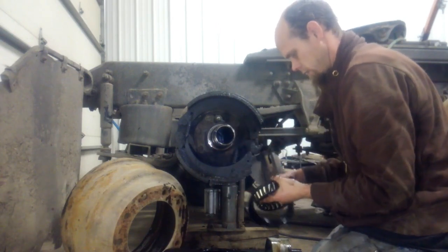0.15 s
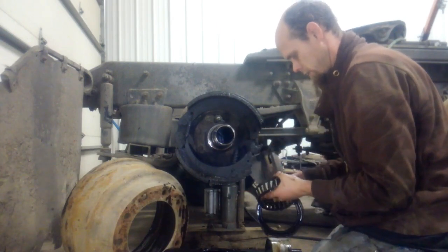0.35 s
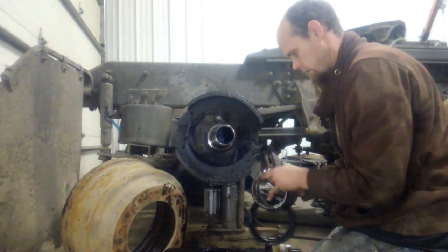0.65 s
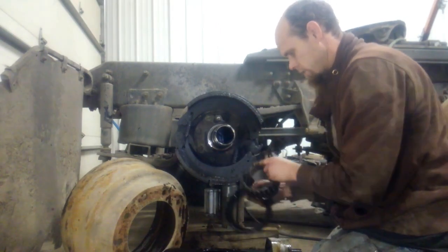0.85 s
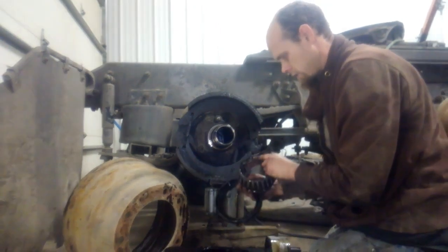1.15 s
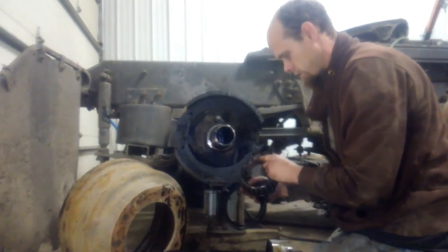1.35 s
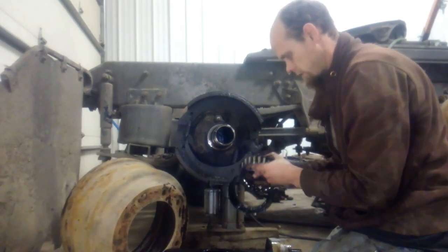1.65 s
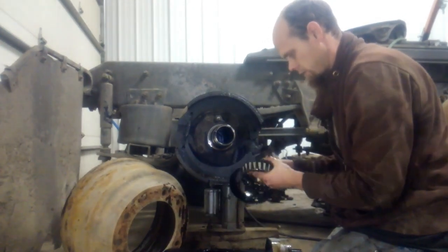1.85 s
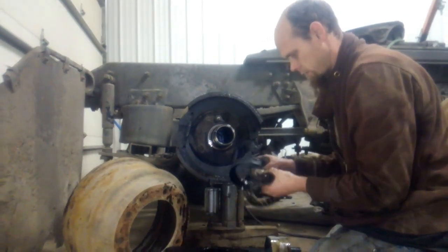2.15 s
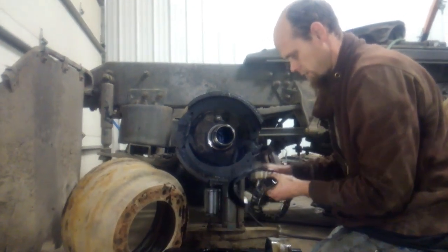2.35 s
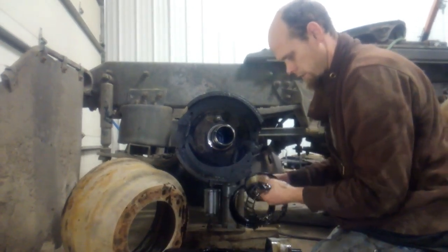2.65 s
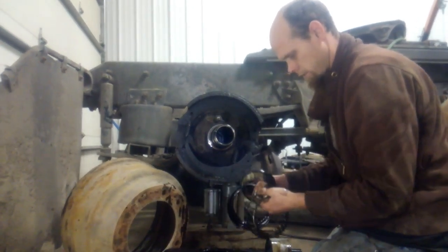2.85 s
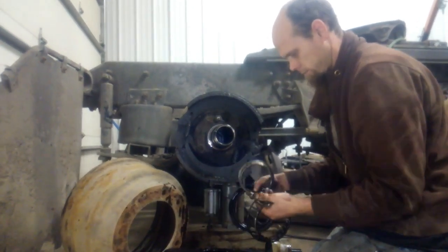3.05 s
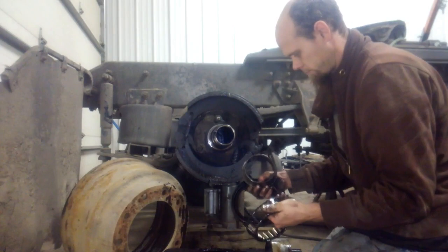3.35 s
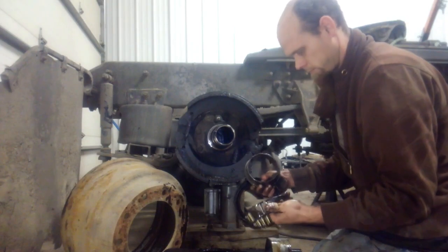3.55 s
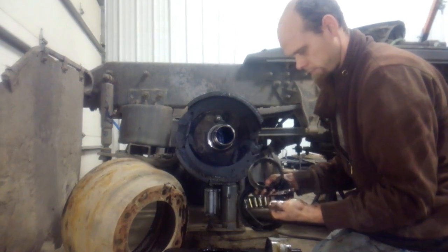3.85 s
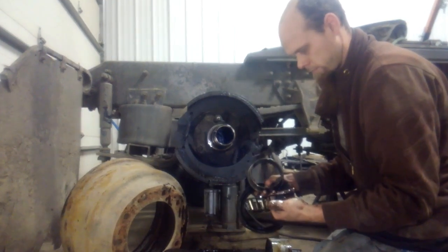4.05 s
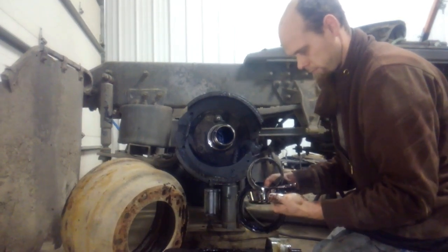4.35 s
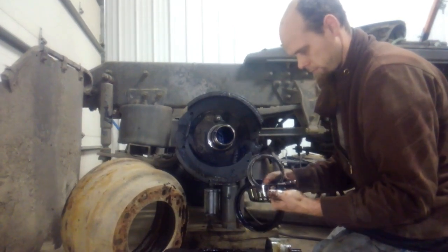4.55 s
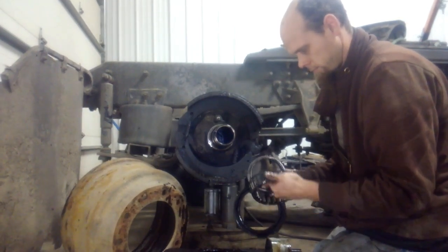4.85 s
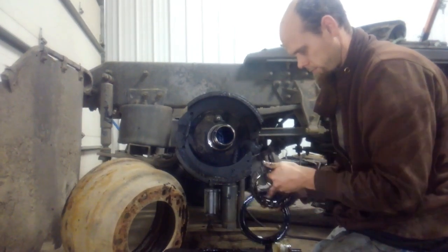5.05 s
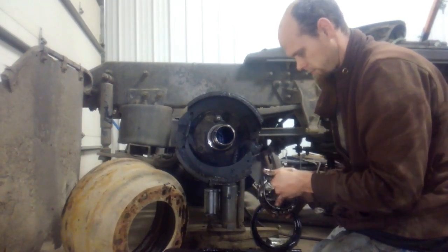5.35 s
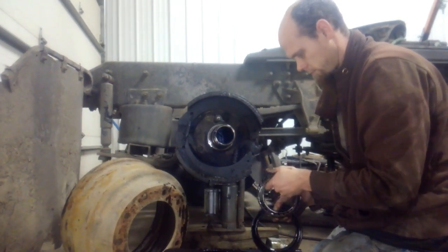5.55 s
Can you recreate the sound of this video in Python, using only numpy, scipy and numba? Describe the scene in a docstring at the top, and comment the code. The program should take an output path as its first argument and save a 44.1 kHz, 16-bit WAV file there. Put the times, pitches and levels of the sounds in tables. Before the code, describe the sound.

Close mono pickup with some hard room reflection and a faint low motor hum. Loose rollers tick in their cage, followed by a busy rattle, a deep hollow bang and uneven dragging. Two prominent ringing steel strikes stand out around three seconds, another is quickly damped, and the shop falls nearly silent before small bright clinks, ticks and a final soft low thump.

```python
"""Roller bearings are handled beside a wheel hub in a workshop: clicks of filtered noise with rattle and cage ring.
A small race tings and a large race is struck and rings, both as sums of decaying modes.
Something heavy bumps (damped low sines) and drags (scraping noise through resonances) with a rumble.
The shop hums behind; the camera's limiter ducks under the loud blows."""
import sys
import numpy as np
from scipy import signal
from scipy.fft import rfft, irfft, next_fast_len
from scipy.io import wavfile
from scipy.ndimage import uniform_filter1d, map_coordinates
from numba import njit

SR = 44100
rng = np.random.default_rng(int(sys.argv[2]) if len(sys.argv) > 2 else 0)


def store_pcm(level_fs):
    """Save levels as 16-bit WAV."""
    pcm = np.round(np.clip(level_fs, -1, 1) * 32767).astype(np.int16)
    wavfile.write(sys.argv[1], SR, np.atleast_2d(pcm).T)


N = 251811

# Levels throughout are ahead of the limiter.
# roller and steel clicks: (time [s], smoothed peak [dB], brightness [dB], looseness [dB])
CLICKS = [(0.016, -34.5, -4, 4.5), (.0615, -25.5, -4, 4), (0.147, -32, -3.5, -2.5),
          (0.2246, -15.5, -0.5, 2), (0.2351, -19, -1.5, -16), (0.436, -38, -1, 3.5), (0.6834, -38, -9, -1),
          (0.7562, -36.5, -3, 2), (0.7655, -38.5, -8, 2.5), (0.8815, -26.5, -0.5, -2),
          (0.9402, -30, -5, -5), (0.9586, -28, -2, 2), (1.047, -41, -13, -12), (1.059, -22, 1, 1.5),
          (1.4725, -34, -1.5, -2), (1.5896, -41, -5, 9.5), (1.621, -36, 12, -5), (1.914, -42, 4, 17),
          (1.9487, -34.5, 7, 3), (1.993, -26.5, 7.5, 9.5), (2.042, -30.5, -4, 8), (2.101, -28, 5, 14),
          (2.1135, -34, -3, 6.5), (2.154, -18.5, 4, 4.5), (2.1716, -22, 8, 13.5),
          (2.2926, -12.5, 6.5, -0.5), (2.317, -17, 8.5, 7.5), (2.337, -23.5, 8, 3), (2.348, -21.5, 13, 2),
          (2.3682, -18, 13, 15.5), (2.3842, -8.5, 8.5, -18), (2.4371, -8, -21, -2),
          (2.4925, -15.5, -16, -3), (2.523, -8.5, -16.5, 2.5), (2.667, -18, 5, 3), (2.7141, -27, -21, 8),
          (2.7598, -19.5, 6.5, -4), (2.7984, -25.5, 11, -8), (2.805, -18, -12, -7),
          (2.9137, -24.5, -35, -15), (2.9534, -28, -8, -3), (2.963, -12, -24.5, -12), (3.006, -21.5, 1, -1),
          (3.047, -18.5, 2, -1), (3.0655, -20, 11, 4.5), (3.1466, -9.5, -1, -9), (3.3641, -14.5, -6, -8),
          (3.4066, -23, -33, -18), (3.49, -14, 15, 17), (3.5016, 2, 14.5, -13), (3.6183, -12, 5, -5),
          (3.665, -19.5, -1, 9), (3.7773, -30.5, 1, -5), (4.9335, -22, 4, 13.5), (5.002, -23.5, -3, 3),
          (5.033, -28, 3, 3), (5.1039, -13.5, 11.5, 1), (5.1535, -15, 10.5, 0.5), (5.2702, -35.5, -11, -1),
          (5.294, -35, -3, 6), (5.3581, -28.5, 2, 13), (5.3925, -24.5, -5, -5), (5.531, -20.5, 25.5, -2),
          (5.5324, -12.5, -10, -2)]
# faint ticks of rollers shifting in the cage: (start [s], end [s], mean smoothed peak [dB])
SHIFTS = [(0.725, 0.797, -40.5), (0.965, 0.995, -51), (1.598, 1.676, -42), (2.659, 2.702, -23.5)]
# click spectrum: (frequency [Hz], density [dB per Hz])
CLICK_COLOUR = [(590, -55), (1000, -25), (2050, -9), (2910, -11), (3120, -10), (3380, -8.5), (4120, -3),
                (4470, -2), (5310, 5), (8450, -11.5), (10800, -20), (14200, -28), (16000, -53)]
# roller cage modes: (frequency [Hz], width [Hz], level [dB])
CAGE_MODES = [(1900, 200, -7), (5330, 320, 0), (7700, 300, -14)]
# small race tings: (time [s], level [dB], t60 [s], main mode [Hz], twin mode [dB], upper modes [dB])
TINGS = [(2.045, -26, 0.31, 5510, -3, -20), (2.101, -19.5, 0.054, 5380, 3, -17),
         (2.158, -31, 0.49, 5647, -18, -12), (2.178, -21, 0.22, 5420, -1, -2),
         (2.209, -25.5, 0.22, 5480, 3, -15), (2.368, -18.5, 0.099, 5440, 5, 6.5),
         (4.935, -16.5, 0.15, 5444, 10.5, 3), (5.004, -18.5, 0.19, 5520, -11, -8),
         (5.034, -13.5, 0.04, 5360, 0.5, -7), (5.292, -20.5, 0.061, 5340, 8, 1.5),
         (5.354, -20, 0.16, 5360, 8, -5), (5.394, -32, 0.25, 5600, -13, -6)]
# small race, other modes: (frequency [Hz], level [dB])
SMALL_RACE_MODES = [(1900, -37), (2005, -22.5), (5313, -37), (5700, -5.5), (7605, -13), (9725, -20.5),
                    (12970, -38), (14520, -39)]
# large race modes: (frequency [Hz], level struck at spot 1 [dB], spot 2 [dB], spot 3 [dB])
BIG_RACE_MODES = [(2060, -30, -24, -18), (2690, -32, -17, -24), (2718, -20, -30, -23),
                  (3176, -24, -26, -28), (3550, -17, -13, -18), (3823, -12, -30, -22),
                  (4251, -11, -22, -34), (4512, 0, -21, -9), (4544, -26, -20, -17), (4632, -23, -1, 0),
                  (5244, 0, -7, -20), (5274, -8, -6, 0), (6062, -3, -12, -14), (6134, -19, -5, -12),
                  (6250, -12, -4, -5), (6922, -5, -10, -18), (7181, -14, -21, -35), (7492, -29, -5, -25),
                  (7800, -6, -14, -19), (7822, -26, -8, -12), (8727, -21, 0, -7), (8895, -31, -10, -27),
                  (9584, -14, -10, -27), (9942, -29, -19, -34), (10417, -24, -13, -30),
                  (11184, -19, -19, -35), (11597, -13, -10, -23), (12592, -16, -17, -35),
                  (13736, -26, -22, -38), (14283, -33, -32, -36)]
# large race strikes, one per spot: (time [s], level [dB], time the ring is quickly damped [s])
STRIKES = [(3.142, -10.5, 3.48), (3.5, -11, 6.2), (3.617, -15.5, 3.69)]
# large race decay: (frequency [Hz], t60 [s])
RING_T60 = [(2000, 0.66), (4000, 0.49), (5000, 0.53), (6100, 0.55), (7500, 0.47), (8700, 0.48),
            (10000, 0.46), (13000, 0.45)]
# dull bumps: (time [s], nominal level [dB], pitch [Hz])
BUMPS = [(.776, -30, 342), (2.323, -36.5, 280), (2.381, -25, 320), (2.4364, 4.5, 603), (2.493, -3.5, 587),
         (2.511, -2.5, 612), (2.523, -1, 634), (2.807, -10.5, 340), (2.918, -9, 574), (2.963, -3, 320),
         (3.368, -11, 320), (3.4035, -8, 596), (4.36, -36, 368), (5.33, -31.5, 219), (5.579, -17, 198)]
# shoves of the heavy part: (start [s], end [s], boom [dB], body [dB], grit [dB],
#                            fade [dB per s, negative swells], power share of the higher boom [0-1])
SHOVES = [(2.435, 2.813, -17, -12, -16.5, 48.5, 0.78), (2.808, 2.959, -16.5, -25, -29, 29, 0.47),
          (2.956, 3.143, -17, -20, -30.5, 44, 0.69), (3.141, 3.37, -32.5, -33, -35, 57, 0.5),
          (3.366, 3.5, -17, -18, -30.5, 51, 0.74), (3.5, 3.912, -34, -31, -27, 67.5, 0.47),
          (5.576, 5.72, -25.5, -36, -42, -26, 0.17)]
# drag booms, low and high: (frequency [Hz], width [Hz])
BOOMS = [(212, 32.6), (325, 87)]
# hollow body wall modes: (frequency [Hz], width [Hz], level [dB])
BODY_MODES = [(564, 71, -3.5), (795, 113, -5.5), (964, 71, -4), (1215, 250, -9), (1717, 170, -12.5),
              (2360, 330, -27)]
# grit spectrum: (frequency [Hz], relative density [dB per Hz])
GRIT_COLOUR = [(760, -3), (1300, -2.5), (1910, -8.5), (2420, -4.5), (3140, -5.5), (5330, -10),
               (12300, -39.5), (14100, -95), (15500, -97)]
# room decay: (frequency [Hz], t60 [s])
SHOP_T60 = [(200, 0.67), (2000, 0.78), (5500, 0.35), (10000, 0.52), (16000, 0.21)]
# shop air noise spectrum: (frequency [Hz], relative density [dB per Hz])
AIR_COLOUR = [(12, -62), (20, -27), (36, -5.5), (60, -7), (124, -8.5), (164, -17), (243, -18), (790, -23.5),
              (859, -24.5), (1020, -25), (4250, -32), (4890, -30), (6130, -33.5), (15000, -39),
              (16400, -55)]
# steady tones of the shop's electrics: (frequency [Hz], level [dB rms])
HUM = [(242.2, -65), (721.4, -68), (839.8, -59), (958.2, -76), (1077, -71.5), (4958, -68.5), (5432, -75),
       (7440, -89)]

TICKS_EACH, TICK_SCATTER_DB = 2, 2.5
TREBLE_DB, TREBLE_DB_PER_BRIGHT_DB = -4.5, 0.94  # shelf above 9 kHz
RATTLE_DB, RATTLE_IN_CAGE = -9, 1.23  # re crack at looseness 0; gain added at cage modes
CAGE_DB, CAGE_DB_PER_CLICK_DB = -25.5, 0.88
TWIN_HZ = 5440
SOFT_DB = -35.5  # below this, bumps are mostly puff
BITE_DB, BITE_S = (4, 5.5, 12.5), 0.0061  # initial jump of boom, body, grit; its time constant
AIR_DB, MOTOR_DB = -47, -48.5  # rms
ATTACK_S, RELEASE_S, KNEE_DB = 0.0018, 0.06, -14.5  # limiter
TOP_HZ = 16000


def amp(db):
    """dB to gain."""
    return 10 ** (np.asarray(db) / 20)


def unit(x):
    """Scaled to rms 1."""
    return x / np.sqrt(np.mean(x ** 2) + 1e-20)


def sine(hz, t):
    """Sine from phase 0."""
    return np.sin(2 * np.pi * hz * t)


def along(points, hz):
    """Interpolates (Hz, value) points on a log-frequency axis."""
    f, v = np.transpose(points)
    return np.interp(np.log(hz + 1), np.log(f + 1), v)


def filtered(x, response):
    """Applies a complex frequency response by FFT."""
    m = next_fast_len(x.shape[-1] + 4096)
    spectrum = rfft(x, m) * response(np.fft.rfftfreq(m, 1 / SR))
    return irfft(spectrum, m)[..., :x.shape[-1]]


def mode(f, hz, width_hz):
    """Causal resonance of peak gain 1."""
    return 1j * f * width_hz / (hz * hz - f * f + 1j * f * width_hz)


def mode_bank(f, table):
    """Parallel resonances with alternating sign."""
    return sum((-1) ** k * amp(db) * mode(f, hz, w) for k, (hz, w, db) in enumerate(table))


def add(track, s, sound):
    """Mixes a sound in at time s."""
    part = track[round(s * SR):][:len(sound)]
    part += sound[:len(part)]


def tail(seconds):
    """A new noise room tail of energy 1; each frequency dies at its own speed."""
    noise = rng.standard_normal(round(seconds * SR))
    hz, t, z = signal.stft(noise, SR, nperseg=256)
    decay_db = -60 * t / along(SHOP_T60, hz)[:, None]
    x = signal.istft(z * amp(decay_db), SR, nperseg=256)[1]
    return x / np.linalg.norm(x)


def flutter(count, rate_hz, depth_db):
    """Random gain: normal dB values, interpolated."""
    knots_db = rng.standard_normal(int(count * rate_hz / SR) + 4)
    return amp(depth_db * map_coordinates(knots_db, [np.arange(count) * rate_hz / SR]))


def clicks():
    """Small hard steel: a short crack, then rattle and room; the cage hums on."""
    out, t = np.zeros(N), np.arange(round(.4 * SR)) / SR

    def cage(f):
        return mode_bank(f, CAGE_MODES)

    ticks = []
    for start, end, db in SHIFTS:
        for _ in range(TICKS_EACH):
            ticks.append((rng.uniform(start, end), rng.normal(db, TICK_SCATTER_DB), 0, 0))
    for s, db, bright_db, loose_db in CLICKS + ticks:
        decay = amp(-60 * t / 0.077) + 1.97 * amp(-60 * t / 0.008)
        onset = 1 - np.exp(-t / 0.00018)
        crack = decay * onset * rng.standard_normal(len(t))
        rattle = filtered(tail(.41)[:len(t)], lambda f: 1 + RATTLE_IN_CAGE * np.abs(cage(f)))
        dry_click = crack + amp(RATTLE_DB + loose_db) * np.linalg.norm(crack) * rattle
        treble_db = TREBLE_DB + TREBLE_DB_PER_BRIGHT_DB * bright_db
        tilt = [(2200, -bright_db), (2900, 0), (7500, 0), (9000, treble_db)]
        # each contact favours other modes
        bumpy = np.c_[np.geomspace(1000, 16000, 30), 2.5 * rng.standard_normal(30)]
        click = filtered(dry_click, lambda f: amp(along(CLICK_COLOUR, f) + along(tilt, f) + along(bumpy, f)))
        peak = uniform_filter1d(np.abs(click[:600]), size=60).max()
        add(out, s, amp(db) * click / peak)
        ring_db = CAGE_DB + CAGE_DB_PER_CLICK_DB * db + loose_db - 60 * t / 0.25
        ring = unit(filtered(rng.standard_normal(len(t)), cage))
        add(out, s, amp(ring_db) * ring)
    return out


def small_race():
    """Decaying modes; the grip shifts the main one per ting, loose rollers make the ring flutter."""
    out, t = np.zeros(N), np.arange(SR // 2) / SR
    for s, db, t60_s, main_hz, twin_db, upper_db in TINGS:
        pair = sine(main_hz, t) - amp(twin_db) * sine(TWIN_HZ, t)
        rest = 0
        for hz, level_db in SMALL_RACE_MODES:
            gain = amp(level_db + upper_db * (hz > TWIN_HZ))
            rest = rest + gain * flutter(len(t), 42, 4.2) * sine(hz, t)
        ring = amp(db - 60 * t / t60_s) * flutter(len(t), 140, 2.5) * (pair + rest)
        room = signal.fftconvolve(ring, tail(.4))[:len(t)]
        add(out, s, ring + amp(-8.5) * room)
    return out


def big_race():
    """Decaying modes, excited differently at each spot; each beats with a weak neighbour."""
    out, t = np.zeros(N), np.arange(SR) / SR
    # many weak modes between the strong, weaker toward the top
    faint = np.c_[rng.uniform(2500, 15800, 30), rng.normal(-27, 4, (30, 3))]
    faint[:, 1:] -= faint[:, :1] / 1200 - 6
    modes = np.r_[BIG_RACE_MODES, faint]
    hz = modes[:, :1]
    near_hz = hz * (1 + 0.00445 * rng.standard_normal(hz.shape))
    for spot, (s, db, damped_s) in enumerate(STRIKES):
        # each mode's level wavers at random
        waver = np.array([flutter(len(t), 26, 2.3) for _ in hz])
        turn = rng.random((2, len(hz), 1))  # phases, in cycles
        pair = np.sin(2 * np.pi * (hz * t + turn[0])) + .2 * np.sin(2 * np.pi * (near_hz * t + turn[1]))
        mode_db = modes[:, [1 + spot]] - 60 * t / along(RING_T60, hz)
        ring = np.sum(amp(mode_db) * pair * waver, axis=0)
        ring = ring * (1 - np.exp(-t / .003))  # soft onset
        room = signal.fftconvolve(ring, tail(0.52))[:len(t)]
        damping_db = -60 * np.maximum(t + s - damped_s, 0) / 0.017
        add(out, s, amp(db + damping_db) * (ring + amp(-11) * room))
    return out


def bumps():
    """A short push into a damped low mode, with a dull noise puff around it."""
    out, t = np.zeros(N), np.arange(round(.15 * SR)) / SR
    for s, db, hz in BUMPS:
        puff = unit(filtered(rng.standard_normal(len(t)), lambda f: mode(f, 1.4 * hz, 1.5 * hz)))
        soft = 1 / (1 + amp(db - SOFT_DB))  # gentle bumps: more puff than note, slower decay
        t60_s = (22 + 14 * soft) / hz
        mix = (1 - soft) * sine(hz, t) + (0.069 + 0.54 * soft) * puff
        add(out, s, amp(db - 60 * t / t60_s) * mix)
    return out


def drag():
    """Uneven scraping shakes a hollow body: boom, wall modes, grit. Each shove bites, then fades or swells."""
    t = np.arange(N) / SR
    gains, high = np.zeros((3, N)), np.zeros(N)
    for start, end, *levels_db, fade_db_per_s, share in SHOVES:
        on = (t >= start) & (t < end)
        age = t[on] - start
        bite = np.exp(-age / BITE_S)
        for gain, db, bite_db in zip(gains, levels_db, BITE_DB):
            gain[on] = amp(db + bite_db * bite - fade_db_per_s * age)
        high[on] = np.clip(share, 0, 1)
    scrape = flutter(N, 120, 1.45) * rng.standard_normal((4, N))
    low, upper = (unit(filtered(x, lambda f: mode(f, hz, w) * mode(f, hz, 3 * w)))
                  for x, (hz, w) in zip(scrape, BOOMS))
    boom = np.sqrt(1 - high) * low + np.sqrt(high) * upper
    body = unit(filtered(scrape[2], lambda f: mode_bank(f, BODY_MODES)))
    grit = unit(filtered(scrape[3], lambda f: amp(along(GRIT_COLOUR, f))))
    return gains[0] * boom + gains[1] * body + gains[2] * grit


def shop():
    """Steady air and motor noise with thin electrical tones."""
    t = np.arange(N) / SR
    air = unit(filtered(rng.standard_normal(N), lambda f: amp(along(AIR_COLOUR, f))))
    motor = unit(filtered(rng.standard_normal(N), lambda f: mode(f, 57.5, 2.9) ** 2))
    hum = sum(np.sqrt(2) * amp(db) * np.sin(2 * np.pi * (hz * t + rng.random())) for hz, db in HUM)
    return amp(AIR_DB) * air + amp(MOTOR_DB) * motor + hum


def scene():
    """All sources at one microphone."""
    # low cut on the bumps and drag
    low_cut = signal.butter(2, 150, "high", fs=SR, output="sos")
    heavy_part = signal.sosfilt(low_cut, bumps() + drag())
    return (clicks() + small_race() + big_race() + heavy_part + shop())[None]


@njit
def follow(x, rise, fall):
    """Peak follower, quick up and slow down."""
    out, level = np.empty(len(x)), 0.
    for i in range(len(x)):
        level += (rise if x[i] > level else fall) * (x[i] - level)
        out[i] = level
    return out


def record(dry):
    """Limiter, ducking in a few ms and recovering in about 0.1 s; soft clip; band limit."""
    level = follow(np.abs(dry[0]), 1 / (ATTACK_S * SR), 1 / (RELEASE_S * SR))
    held = dry / (1 + (level / amp(KNEE_DB)) ** 4) ** 0.23
    clipped = held / (1 + np.abs(held / .95) ** 6) ** (1 / 6)
    return filtered(clipped, lambda hz: (hz < TOP_HZ) / (1 + (40 / (hz + 1)) ** 6))


dry = scene()
out = record(dry)
store_pcm(out)
```